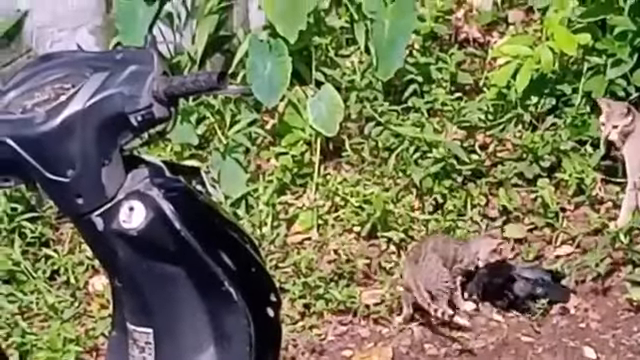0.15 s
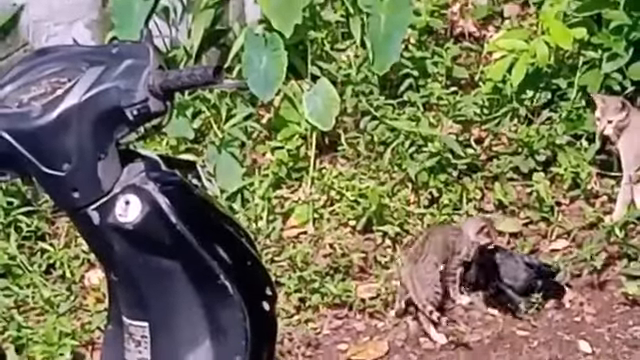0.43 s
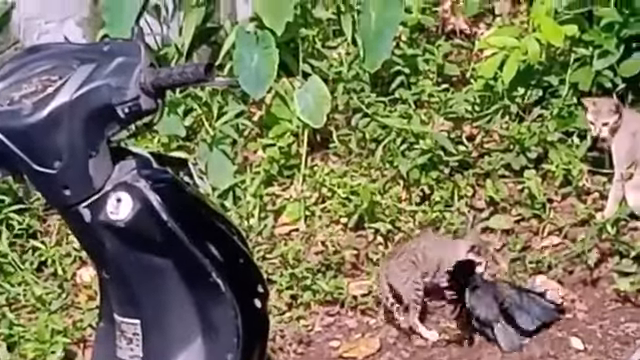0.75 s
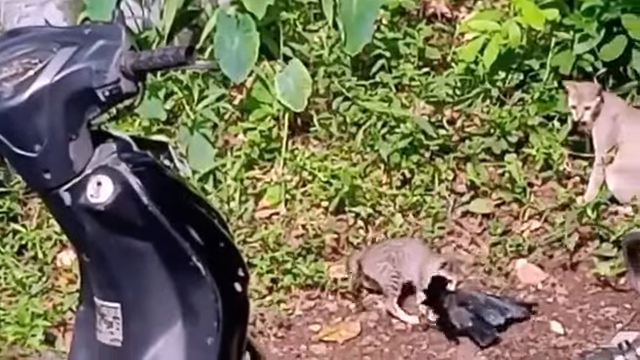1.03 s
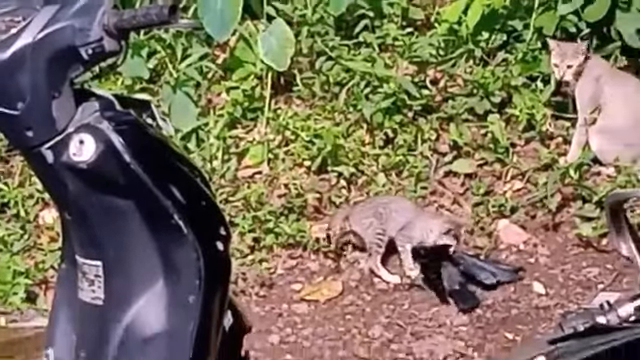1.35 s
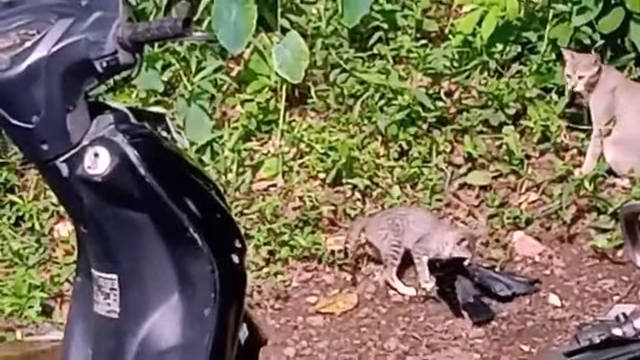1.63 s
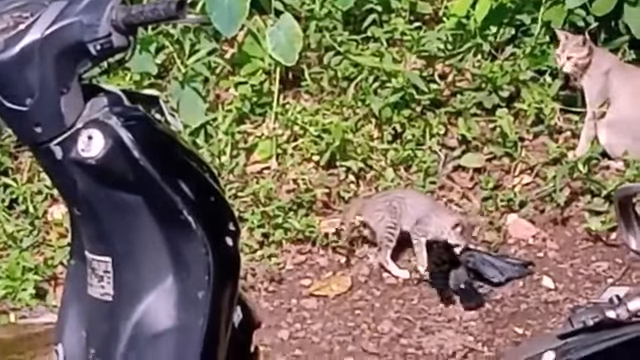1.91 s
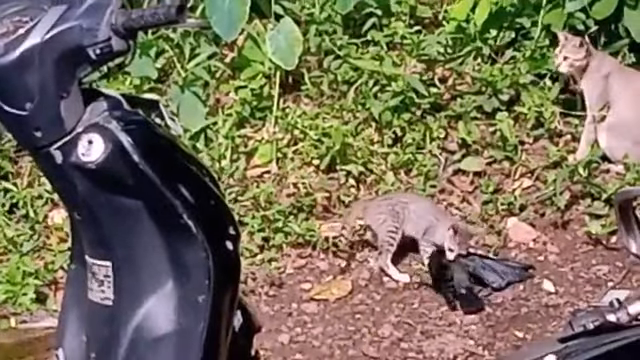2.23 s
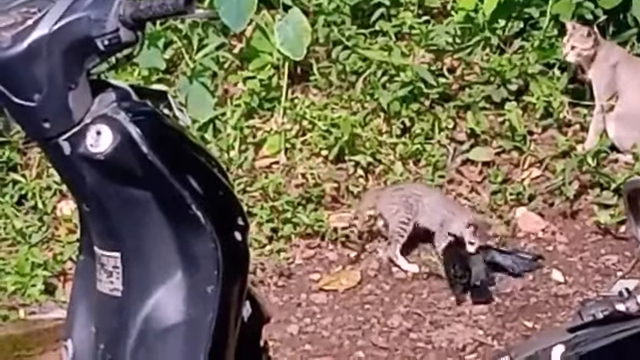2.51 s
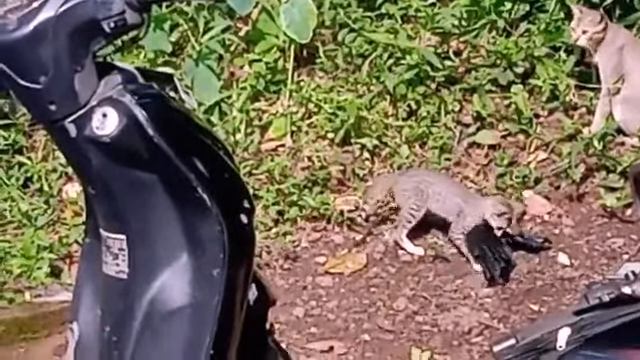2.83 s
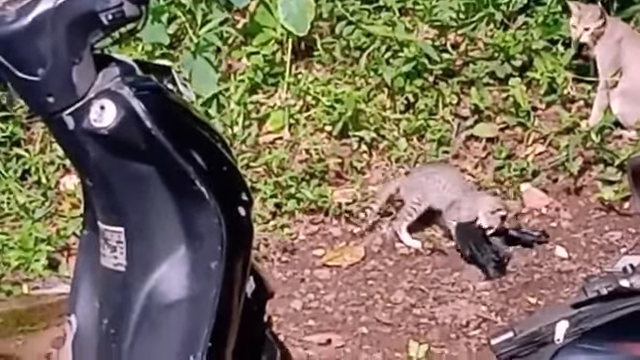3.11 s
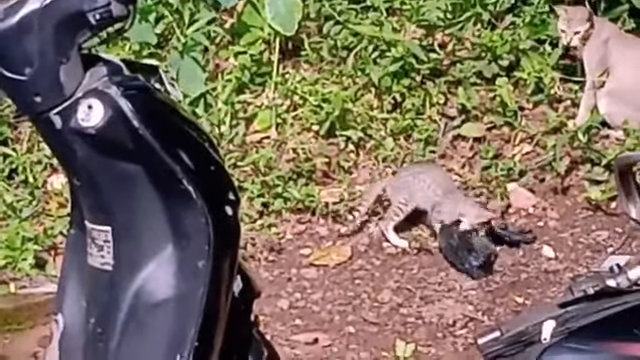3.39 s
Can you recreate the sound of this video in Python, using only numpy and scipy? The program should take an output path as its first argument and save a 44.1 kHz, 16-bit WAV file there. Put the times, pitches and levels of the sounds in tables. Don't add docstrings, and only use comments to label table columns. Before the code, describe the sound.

Crows caw throughout, hoarse, nasal and rattling, each call about a quarter second. From 0 to 2.2 seconds near and middle birds overlap thickly; afterwards close calls are sparser and weaker, with renewed caws near 2.5 and 3.1-3.4 seconds. A far flock blurs into outdoor echoes. Thin whistles edge some caws; very faint low coos and wind puffs lie beneath. Nearly mono, grainy phone sound.

```python
import sys
import numpy as np
from scipy import signal
from scipy.fft import rfft, irfft, dct, next_fast_len
from scipy.io import wavfile
from scipy.ndimage import uniform_filter1d

SR = 44100
rng = np.random.default_rng(int(sys.argv[2]) if len(sys.argv) > 2 else 0)


def field_ratio(decibels):
    return 10 ** (np.asarray(decibels, dtype=float) / 20)


def unload_audio(sound):
    columns = np.transpose(np.atleast_2d(sound))
    steps = np.round(np.clip(columns, -1, 1) * 32767)
    wavfile.write(sys.argv[1], SR, steps.astype(np.int16))


N = 156555

# f/Hz, density/dB
AIR_SPECTRUM = [(18, -54), (30, -26), (92, -1.5), (205, -11.5), (419, -1.5), (531, -10.5), (700, 0.5),
                (910, -25.5), (1540, -120)]
# t/s, length/s, level/dB, centre f/Hz
WIND_THUMPS = [(0.026, 0.056, -77, 88), (.14, 0.17, -77, 89.5), (0.698, 0.049, -78, 98),
               (0.815, 0.08, -71.5, 77.4), (1.12, 0.13, -71.5, 97.2), (1.28, 0.031, -73, 108),
               (1.351, 0.072, -70, 314), (1.42, 0.089, -73, 157), (1.593, 0.11, -77, 93.2),
               (1.834, 0.071, -73.5, 96), (2.07, 0.094, -64, 100.4), (2.15, 0.08, -64.5, 104.6),
               (2.29, .1, -72.5, 78.7), (2.633, 0.08, -74, 96), (2.718, 0.11, -71.5, 85.5),
               (2.868, 0.05, -72, 89), (2.95, 0.063, -65.5, 90.5), (3.073, 0.036, -69.5, 96),
               (3.193, 0.15, -72.5, 90.7), (3.37, 0.1, -76, 82)]
# t/s, length/s, pitch f/Hz, level/dB
DISTANT_COOS = [
    (0.011, 0.36, 415, -71),
    (0.248, 0.37, 405, -67.5),
    (1.0, 0.33, 518, -73),
    (2.659, 0.28, 416.6, -69.5),
]
# t/s, length/s, pitch f/Hz, level/dB, throat f/Hz
MIDDLE_CAWS = [(-.15, 0.26, 461.6, -41.5, 1903), (.14, 0.26, 487.7, -43.5, 1496),
               (.36, 0.3, 488.2, -43.5, 1796), (.6, 0.28, 501.6, -42, 1926), (.84, 0.13, 516.4, -48, 1940),
               (1.07, 0.26, 531.7, -47.5, 1633), (1.2, 0.18, 406.1, -44.5, 1725),
               (1.33, 0.26, 467, -44.5, 2004), (1.5, 0.25, 478.8, -47, 1925),
               (1.66, 0.23, 470.8, -43.5, 1980), (1.82, 0.17, 516.5, -44, 2126),
               (1.95, 0.32, 455.3, -45.5, 1786), (1.94, 0.26, 457, -51, 1386), (2.48, 0.28, 486, -53, 1490),
               (2.6, 0.27, 525.3, -60, 1060), (2.9, .13, 500, -58, 1010), (2.26, 0.3, 474.4, -43.5, 1813),
               (2.47, 0.26, 496.8, -49.5, 1817), (2.57, 0.21, 502.7, -53, 2095),
               (2.72, 0.21, 479, -49, 2010), (2.86, 0.16, 500.3, -51, 1925),
               (3.08, 0.29, 477.8, -49.5, 1496), (3.3, 0.26, 505.7, -49, 2177),
               (3.33, .25, 529.2, -51, 1640), (.88, .2, 519, -50, 1590), (.64, .24, 470, -47, 1470),
               (1.3, .25, 530, -46, 1600), (2.15, .2, 490, -51, 1950), (2.97, .2, 490, -53, 1900)]
# t/s, length/s, pitch f/Hz, level/dB, throat f/Hz
NEAR_CAWS = [(.05, .24, 458, -40.5, 1764), (.17, 0.26, 513, -41, 2033), (.57, 0.25, 479.8, -41.5, 1910),
             (.7, 0.25, 479, -44.5, 1950), (.88, 0.23, 496.9, -45, 2046), (1.27, 0.28, 491, -40.5, 1790),
             (1.64, 0.28, 519.4, -44, 1614), (1.92, 0.24, 483.6, -44, 1753),
             (2.28, 0.13, 448.3, -56.5, 1700), (2.5, 0.19, 507.2, -48, 1933), (3.14, .24, 477.5, -45, 1950),
             (3.38, 0.22, 475.4, -51, 2006)]
# t/s, length/s, first f/Hz, last f/Hz, level/dB
BEAK_WHISTLES = [(0.121, .2, 4400, 4760, -58.5), (0.149, .28, 6100, 5950, -58),
                 (0.662, .22, 4450, 4830, -58.5), (0.902, .2, 4690, 4710, -63),
                 (1.269, .28, 4320, 4580, -60), (1.302, .25, 5900, 6100, -57.5),
                 (1.629, .24, 4720, 4640, -59), (1.962, .22, 4390, 4350, -59),
                 (1.925, .25, 6070, 5800, -58), (2.27, .14, 4220, 4220, -63.5),
                 (2.551, .12, 6480, 6550, -64.5), (2.66, .16, 4520, 4430, -65)]
# f/Hz, width/Hz, level against the throat/dB
NECK_RINGS = [(960, 620, -13), (1450, 300, -8), (2400, 300, -16)]
# f/Hz, width/Hz, level against the throat/dB
BEAK_RINGS = [(4664, 1600, -13), (6100, 1100, -11.5), (7030, 810, -14.5), (9190, 4500, -19.5),
              (14730, 710, -23)]
# f/Hz, level/dB
MIC_COLOUR = [(300, -21), (650, -11), (800, -1), (2100, 2.5), (2600, -4.5), (3400, -5), (7600, -9),
              (8100, -14)]
# f/Hz, level/dB
GRAIN_STEP = [(100, -7), (800, -9), (2200, -13), (3000, 4), (3600, 7), (4300, -1), (7300, -1), (8000, 12),
              (9300, 11), (11500, 7), (15000, 4)]
# from f/Hz, to f/Hz, share dropped [0-1], chance/dB
TREBLE_GATES = [(11700, 12400, .35, 7), (12400, 13100, .72, 9), (13100, 13700, .87, 9),
                (13700, 14400, .78, 9), (14400, 15200, .33, 1.5), (15200, 15700, .62, 5),
                (15700, 22050, 1., 0)]
# t/s, length/s
RICH_SPANS = [(0, .04), (.07, .41), (.51, 1.07), (1.76, .32), (2.12, .07), (2.36, .04), (2.43, .11),
              (2.6, .06), (2.74, .12), (2.93, .14), (3.32, .3)]
# t/s, up to f/Hz
BASS_HOLES = [(.34, 200), (.38, 130), (.48, 170), (.5, 130), (.57, 260), (.65, 300), (.67, 300), (.78, 240),
              (.95, 130), (1.02, 110), (1.1, 110), (1.6, 150), (1.97, 350), (1.99, 330), (2.05, 200),
              (2.6, 110), (3.03, 150), (3.46, 130)]

THROAT_WIDTH_HZ, LEAK_DB = 580, -33
NECK_SPREAD, BEAK_SPREAD_DB = .1, 1.5
RATTLE_HZ, RATTLE_SPREAD, RATTLE_DEPTH, BREATH_RATTLE = 82, .1, .7, .3
ATTACK_S, RELEASE_S = .07, .07
ARCH, SAG, WANDER = .05, .02, .013
FLOCK_HZ, FLOCK_SPREAD, FLOCK_DB = 480, .1, -47
ECHO_DB, ECHO_T60_S, SIDE_DB = -5, .5, -33
GRAIN_LINES, GRAIN_PAD = 1024, 478
GRAIN_MEMORY_S, GRAIN_FRAME_DB, GRAIN_BAND_DB, RICH_DB = .09, 1.5, 2.5, 9


def level(x, db):
    return x * field_ratio(db) / np.sqrt(np.mean(x ** 2) + 1e-18)


def wobble(n, rate):
    k = max(int(SR / rate), 1)
    smooth = uniform_filter1d(rng.standard_normal(n), k)
    return level(uniform_filter1d(smooth, k), 0)


def phase_of(hz):
    return 2 * np.pi * np.cumsum(hz) / SR


def frequencies(size):
    return np.fft.rfftfreq(size, 1 / SR) + 1


def curve(f, points):
    hz, db = np.transpose(points)
    return np.interp(np.log(f), np.log(hz), db)


def ring(f, hz, width_hz):
    return 1 / (1 + 1j * (f / width_hz - hz ** 2 / (f * width_hz))) ** 2


def colour(x, points):
    return irfft(rfft(x) * field_ratio(curve(frequencies(N), points)), N)


def swell(length, attack, release):
    t = np.arange(int(length * SR)) / SR
    rise_or_fall = np.minimum(t / attack, (length - t) / release)
    return t / length, np.sin(np.pi / 2 * np.clip(rise_or_fall, 0, 1)) ** 2


def add(out, x, start):
    i = int(start * SR)
    a, b = max(i, 0), min(i + len(x), N)
    out[a:max(a, b)] += x[a - i:max(a, b) - i]


def wind():
    air = colour(rng.standard_normal(N), AIR_SPECTRUM)
    out = level(air * field_ratio(3 * wobble(N, 22)), -68.5)
    for s, length, db, hz in WIND_THUMPS:
        env = swell(length, .035, .03)[1]
        n = len(env)
        size = n + 2048
        flap = np.sin(phase_of(hz * (1 + .2 * wobble(n, 50))))
        puff = (rng.standard_normal(n) + .15 * flap) * env * field_ratio(2.8 * wobble(n, 22))
        thump = irfft(rfft(puff, size) * ring(frequencies(size), hz, .61 * hz), size)
        add(out, level(thump, db), s)
    return out


def coos():
    out = np.zeros(N)
    for s, length, hz, db in DISTANT_COOS:
        env = swell(length, .066, .15)[1]
        n = len(env)
        tone = np.sin(phase_of(hz * (1 + .036 * wobble(n, 98)))) * field_ratio(2.6 * wobble(n, 46))
        add(out, level(tone * env, db), s)
    return out


def echo(x):
    t = np.arange(SR // 2) / SR
    tail = rng.standard_normal(len(t)) * field_ratio(-60 * t / ECHO_T60_S) * np.clip(t / .016, 0, 1)
    return signal.fftconvolve(x, tail / np.sqrt(np.sum(tail ** 2)))[:N]


def flock(count):
    rows = []
    for k, (late, strong, pitch, throat) in enumerate(rng.standard_normal((count, 4))):
        start = -.25 + 3.8 * (k + .15 * late) / count
        hz = FLOCK_HZ * (1 + FLOCK_SPREAD * pitch)
        rows.append((start, .27 + .03 * strong, hz, 1.2 * strong, 1840 + 150 * throat))
    return level(crows(rows, beak_db=-2, jitter=.012, rattle=.6, breath_share=.55), FLOCK_DB)


def whistles():
    out = np.zeros(N)
    for s, length, hz, end_hz, db in BEAK_WHISTLES:
        u, env = swell(length, .03, .06)
        pitch = (hz + (end_hz - hz) * u) * (1 + .006 * wobble(len(u), 150))
        strand = np.sin(phase_of(pitch)) * env * field_ratio(4 * wobble(len(u), 60))
        add(out, level(strand, db), s)
    return out


def crow_voice(length, hz, jitter, rattle, breath_share):
    u, env = swell(length, ATTACK_S, RELEASE_S)
    n = len(u)
    bend = -ARCH * (2 * u - 1) ** 4 - SAG * (u - .5)
    phase = phase_of(hz * (1 + bend + jitter * wobble(n, 163.5) + WANDER * wobble(n, 35)))
    harmonics = np.arange(1, 25)[:, None]
    pulses = np.cos(harmonics * phase + 2 * np.pi * rng.random((24, 1))).sum(axis=0) / 4
    breath = rng.standard_normal(n) * (1 + 1.4 * np.cos(phase))
    unevenness = rng.standard_normal() + wobble(n, 40.6)
    chop = np.exp(rattle * np.cos(phase_of(RATTLE_HZ * (1 + RATTLE_SPREAD * unevenness))))
    tone = np.sqrt(1 - breath_share) * pulses * chop
    return (tone + np.sqrt(breath_share) * breath * chop ** BREATH_RATTLE) * env


def crow_body(f, throat_hz, beak_db):
    throat = ring(f, throat_hz, THROAT_WIDTH_HZ)
    power = abs(throat) ** 2 + field_ratio(LEAK_DB) ** 2
    for hz, width_hz, db in NECK_RINGS:
        neck_hz = hz * (1 + NECK_SPREAD * rng.standard_normal())
        power += abs(field_ratio(db) * ring(f, neck_hz, width_hz)) ** 2
    for hz, width_hz, db in BEAK_RINGS:
        gain = field_ratio(db + beak_db + BEAK_SPREAD_DB * rng.standard_normal())
        power += abs(gain * ring(f, hz, width_hz)) ** 2
    return np.sqrt(power) * throat / abs(throat)


def crows(table, beak_db, jitter, rattle, breath_share):
    out = np.zeros(N)
    for s, length, hz, db, throat_hz in table:
        voice = crow_voice(length, hz, jitter, rattle, breath_share)
        size = next_fast_len(len(voice) + 512)
        body = crow_body(frequencies(size), throat_hz, beak_db)
        add(out, level(irfft(rfft(voice, size) * body, size), db), s)
    return out


def scene():
    birds = flock(count=44)
    birds += crows(MIDDLE_CAWS, beak_db=-1.5, jitter=.014, rattle=RATTLE_DEPTH, breath_share=.42)
    birds += crows(NEAR_CAWS, beak_db=1.22, jitter=.008, rattle=RATTLE_DEPTH, breath_share=.36)
    mid = colour(birds + field_ratio(ECHO_DB) * echo(birds), MIC_COLOUR) + whistles() + coos() + wind()
    side = field_ratio(SIDE_DB) * echo(mid)
    return np.array([mid + side, mid - side])


def drop_bands(lines, f):
    m, count = GRAIN_LINES, lines.shape[1]
    when = (np.arange(count) * m - GRAIN_PAD) / SR
    for s, hz in BASS_HOLES:
        lines[:, np.argmin(abs(when - s - m / (2 * SR))), f < hz] = 0
    rich = RICH_DB * sum((when > s) & (when < s + length) for s, length in RICH_SPANS)
    luck = rng.standard_normal(count)
    for lo, hi, share, chance_db in TREBLE_GATES:
        favour = rich + chance_db * luck
        closed = favour <= np.quantile(favour, share)
        lines = lines * (1 - closed[:, None] * ((f > lo) & (f < hi)))
    return lines


def phone_grain(x):
    m, h, count = GRAIN_LINES, GRAIN_LINES // 2, N // GRAIN_LINES + 3
    lead = GRAIN_PAD + m
    w = np.sin(np.pi * (np.arange(2 * m) + .5) / (2 * m))
    blocks = np.pad(x, ((0, 0), (lead, (count + 1) * m - N - lead))).reshape(2, count + 1, m)
    a, b = blocks[:, :-1] * w[:m], blocks[:, 1:] * w[m:]
    folded = [-b[..., h - 1::-1] - b[..., h:], a[..., :h] - a[..., :h - 1:-1]]
    lines = dct(np.concatenate(folded, axis=-1), type=4, norm="ortho")
    f = (np.arange(m) + .5) * SR / (2 * m)
    local = uniform_filter1d(lines[0] ** 2, size=24, axis=1)
    local = uniform_filter1d(local, max(int(GRAIN_MEMORY_S * SR / m), 1), axis=0)
    frame_db = GRAIN_FRAME_DB * rng.standard_normal((count, 1))
    band_db = GRAIN_BAND_DB * np.repeat(rng.standard_normal((count, m // 16)), 16, axis=1)
    step = np.sqrt(abs(local) + 1e-20) * field_ratio(curve(f, GRAIN_STEP) + frame_db + band_db)
    lines = drop_bands(lines, f)
    rounded = np.sign(lines) * np.floor(abs(lines) / step + .4) * step
    v = dct(rounded, type=4, norm="ortho")
    out = np.zeros_like(blocks)
    out[:, :-1] += np.concatenate([v[..., h:], -v[..., :h - 1:-1]], axis=-1) * w[:m]
    out[:, 1:] -= np.concatenate([v[..., h - 1::-1], v[..., :h]], axis=-1) * w[m:]
    return out.reshape(2, -1)[:, lead:lead + N]


def roll_off(x):
    return signal.sosfilt(signal.butter(12, 16510, fs=SR, output="sos"), x)


def record(dry):
    mix = phone_grain(dry)
    return roll_off(mix)


dry = scene()
out = record(dry)
unload_audio(out)
```